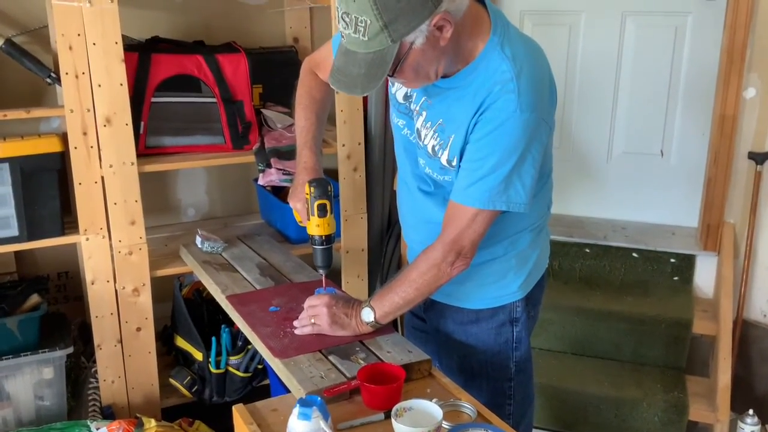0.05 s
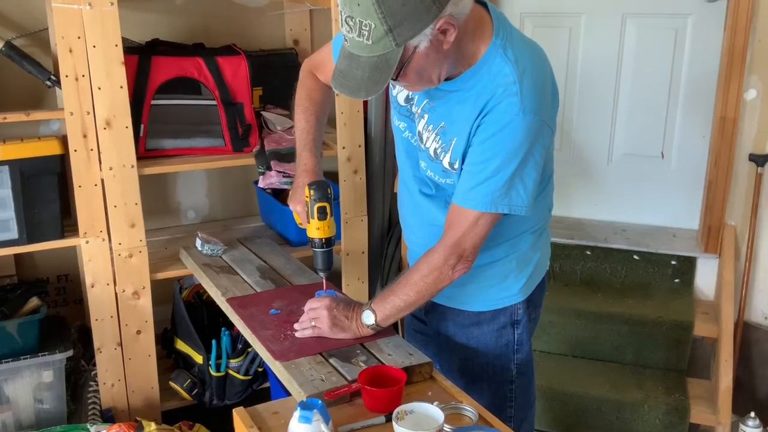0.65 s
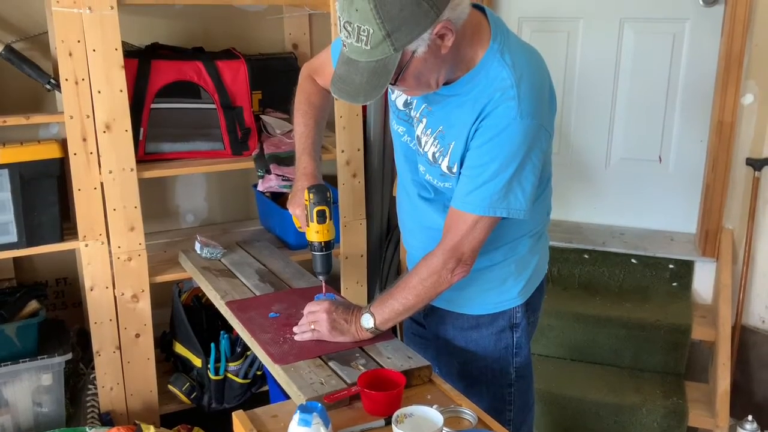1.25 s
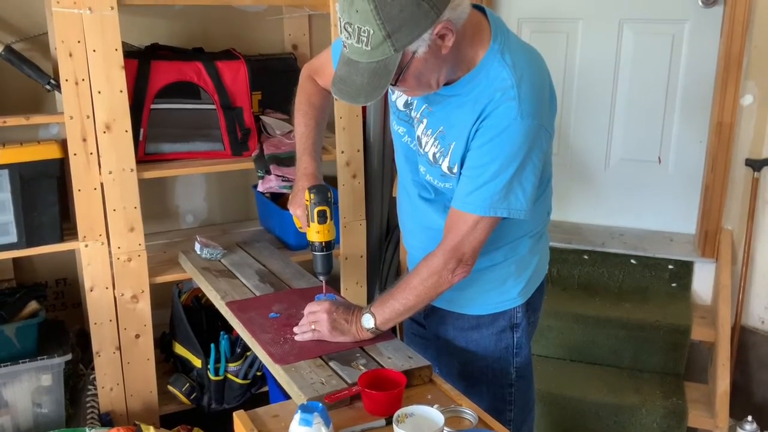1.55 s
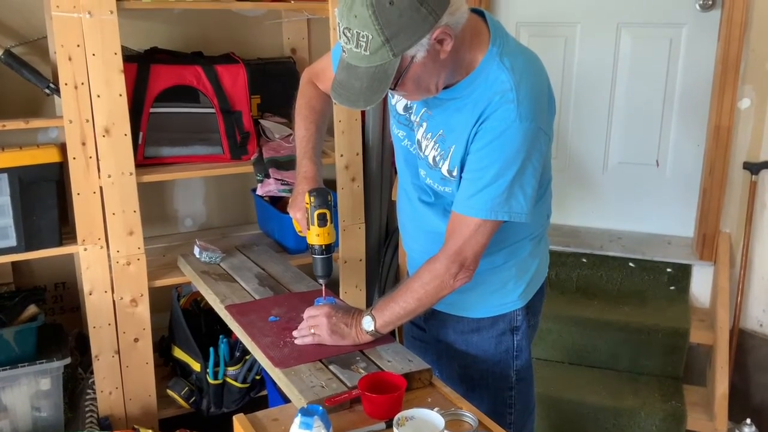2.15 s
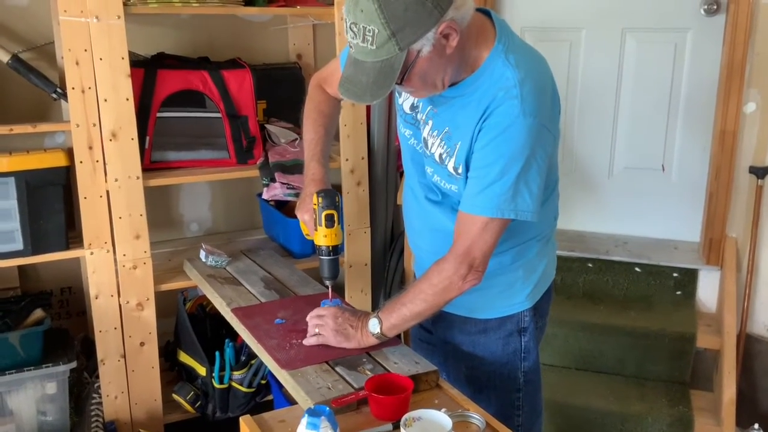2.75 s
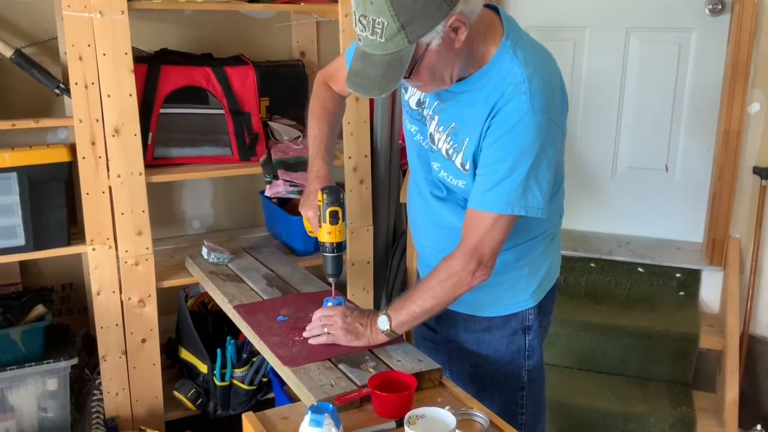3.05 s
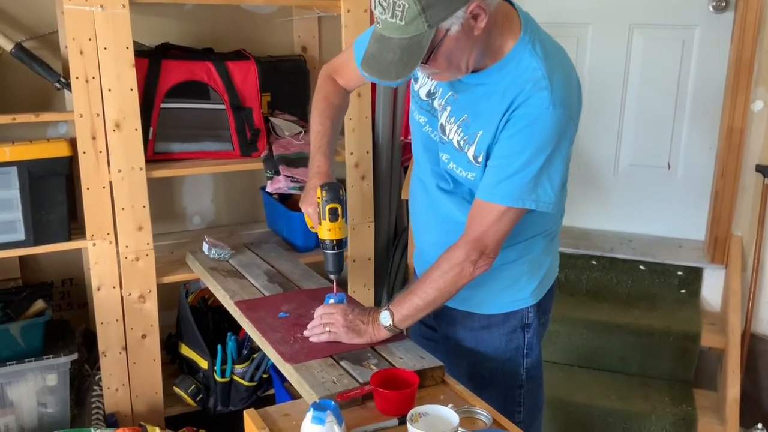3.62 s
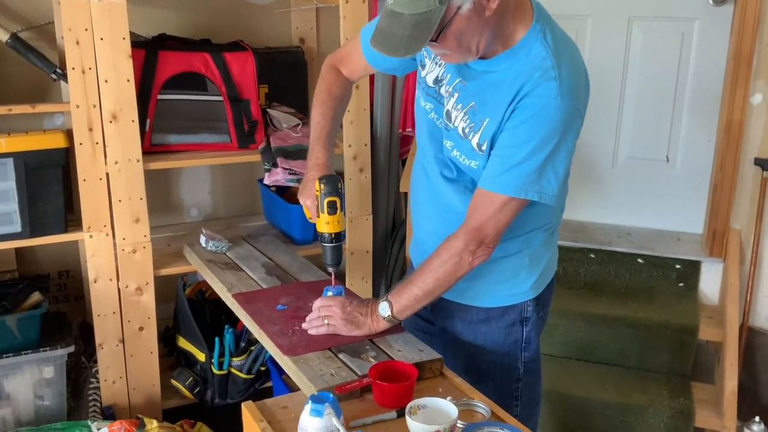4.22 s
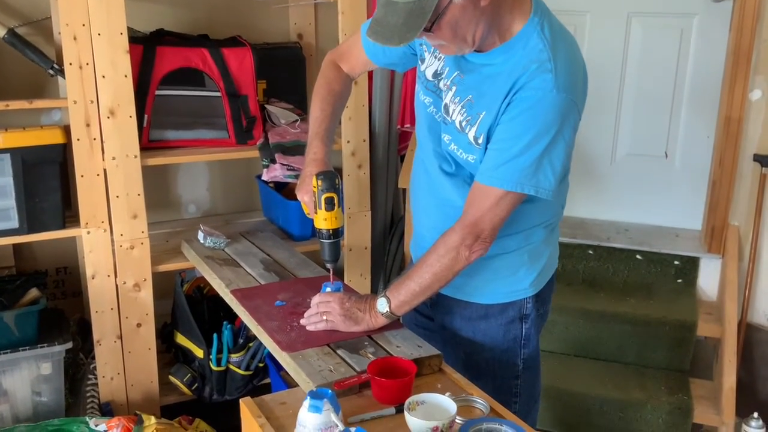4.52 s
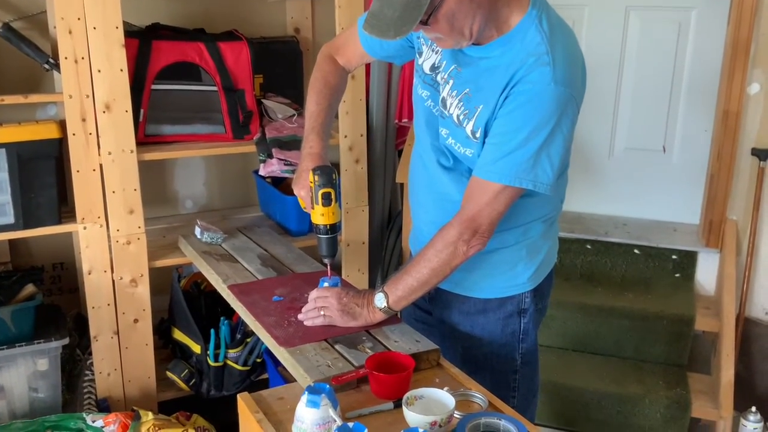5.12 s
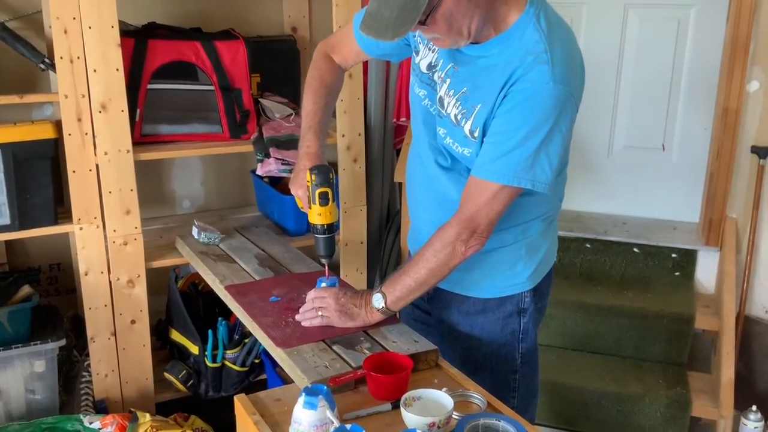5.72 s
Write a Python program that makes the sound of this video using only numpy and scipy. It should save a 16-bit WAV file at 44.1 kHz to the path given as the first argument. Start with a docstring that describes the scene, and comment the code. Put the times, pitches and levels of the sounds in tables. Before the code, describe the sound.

A cordless drill runs without a break, giving an even, high whine over a faint motor hum and gear buzz. Its bit grinds into wet china with a gritty, ringing hiss that shifts slightly as it grips and briefly skids. The wooden bench rumbles underneath and drones more near the end as the hand presses harder. A stereo microphone pair sits close to the bench in a workshop.

```python
"""A workshop, a stereo microphone pair near the bench: a cordless drill grinds through wet china.
The motor hums and whines on multiples of its shaft rate; the planetary gearbox adds two more families
of tones. Countless grit fractures make a hiss that rings in the china and the bit, shifting as the bit
grips and skids. The bench rumbles underneath, and its boards drone as the hand leans in."""
import sys
import numpy as np
from scipy import signal
from scipy.fft import rfft, irfft
from scipy.io import wavfile

SR = 44100
rng = np.random.default_rng(int(sys.argv[2]) if len(sys.argv) > 2 else 0)


def int16_out(signal):
    """Quantize to a 16-bit WAV file."""
    q = np.round(np.clip(np.atleast_2d(signal).T, -1, 1) * 32767)
    wavfile.write(sys.argv[1], SR, q.astype(np.int16))


N = 254898
TIME_S = np.arange(N) / SR
BIN_HZ = np.maximum(np.arange(N // 2 + 1), 1) * SR / N
SIDES = np.array([[.5], [-.5]])  # left and right microphone each take half of a difference


def from_db(db):
    """Decibels to gain."""
    return 10 ** (np.asarray(db) / 20)


def rms_one(x):
    """Scale to rms 1."""
    return x / np.sqrt(np.mean(x ** 2) + 1e-20)


def panned(pan_db):
    """Gains at the two microphones; positive is to the left."""
    return from_db(pan_db * SIDES)


def in_time(rows):
    """A curve of (time [s], value) at every sample."""
    return np.interp(TIME_S, *np.transpose(rows))


def in_pitch(rows):
    """Each column of a spectrum, at every bin."""
    hz, *columns = np.transpose(rows)
    return [np.interp(np.log(BIN_HZ), np.log(hz), column) for column in columns]


def bump(middle_s, half_s):
    """A smooth rise and fall of height 1."""
    return np.exp(-((TIME_S - middle_s) / half_s) ** 2)


def drift(rate_hz):
    """Random wander of rms 1, mostly slower than rate_hz."""
    hop, settle = 40, 2000
    pole = np.exp(-2 * np.pi * rate_hz * hop / SR)
    noise = rng.standard_normal(N // hop + settle + 2)
    slow = signal.lfilter([1], [1, -2 * pole, pole * pole], noise)[settle:]
    return np.interp(np.arange(N) / hop, np.arange(len(slow)), rms_one(slow))


def resonance(hz, width_hz):
    """Gain per bin of a resonance, 1 at its peak."""
    return 1 / (1 + ((BIN_HZ ** 2 - hz ** 2) / (BIN_HZ * width_hz)) ** 2)


def tone(turns, partial, rough, flutter_hz):
    """One partial at both microphones; uneven load shakes its height and phase."""
    multiple, level_db, pan_db, lead = partial
    angle = 2 * np.pi * ((multiple * turns + rng.random()) % 1) + rough * drift(flutter_hz)
    height = np.sqrt(2) * from_db(level_db) * panned(pan_db) * (1 + rough * drift(flutter_hz))
    return height * np.cos(angle + lead * SIDES)


def beating(beat_hz=.895, slowing_hz_per_s=.084, first_swell_s=.38, depth=.42):
    """Height of two close tones slipping past each other ever more slowly: broad swells, short dips."""
    t = TIME_S - first_swell_s
    beats = beat_hz * t - slowing_hz_per_s * t ** 2 / 2
    return np.abs(1 + depth * np.exp(2j * np.pi * beats)) / np.hypot(1, depth)


def motor(turns, lean, grip, skid, hum_trim_db=-.5, pan_db_per_load=3, tilt_rad=.79):
    """Unbalance hums at the shaft rate; the pinion's teeth whine high above it, with looser sidebands."""
    # hum, whine and whistle: (multiple of shaft rate, base level [dB], left-right [dB], left lead [rad])
    main_tones = [(1, -51.0, -1.2, -0.0), (11, -33.2, 0.0, 2.4), (33, -44.9, -0.4, -0.5)]
    # weaker tones and sidebands: (multiple of shaft rate, level [dB], left-right [dB], left lead [rad])
    sidebands = [(2, -63.0, -2.9, 1.2), (10, -55.6, -0.8, 2.8), (10.4, -51.7, -0.0, 2.7),
                 (10.6, -49.9, -1.6, 2.7), (10.8, -49.5, -0.7, 2.4), (12, -46.0, -0.1, 1.5),
                 (13, -55.9, -0.7, 0.4), (21, -53.6, -1.5, 0.3), (22, -52.0, -1.9, 0.5),
                 (31, -56.3, -0.6, -0.1), (32, -52.1, -1.0, -0.3), (34, -51.7, -0.6, -0.4)]
    # swells and dips of the whine: (time [s], gain [dB])
    whine_swells = [(0, 1.2), (1.6, 1.5), (2.1, 0), (3.25, -0.5), (3.55, -4), (3.9, -3), (4.07, 2.5),
                    (4.3, -3), (4.7, -2), (4.95, 2.5), (5.5, 2.5), (5.78, -1.5)]
    hum, (*whine, lead), whistle = main_tones
    # leaning in tilts the drill: the whine moves left and its phase turns between the microphones
    tilted_whine = (*whine, lead + tilt_rad * bump(middle_s=4.48, half_s=.21))
    whine_gain = from_db(in_time(whine_swells)) * panned(pan_db_per_load * lean)
    whistle_db = -2 + 6 * grip - 5 * skid
    out = from_db(hum_trim_db) * beating() * tone(turns, hum, rough=.21, flutter_hz=13)
    out += whine_gain * tone(turns, tilted_whine, rough=.12, flutter_hz=22)
    out += from_db(whistle_db) * tone(turns, whistle, rough=.18, flutter_hz=32)
    return out + sum(tone(turns, row, rough=.59, flutter_hz=7.9) for row in sidebands)


def gearbox(turns, lean, mesh_per_turn=2.748, planet_per_turn=.8751, pan_db_per_load=-7):
    """Meeting teeth give a clear tone with overtones, over the planet gears' buzz and a faint low hum."""
    # teeth meeting: (multiple of mesh rate, base level [dB], left-right [dB], left lead [rad])
    mesh_tones = [(1, -47, 6.5, 1.31), (2, -47.5, 5, -1.7), (3, -44.5, -1, -2.5), (5, -53, -5, -0.5)]
    # planets circling: (multiple of planet rate, base level [dB], left-right [dB], left lead [rad])
    planet_tones = [(1, -57.8, 0.7, -0.2), (2, -61.6, -5.0, 1.3), (17, -54.7, -0.7, 0.4),
                    (20, -59.8, -3.0, 0.3), (21, -52.5, -2.3, 0.5), (22, -57.2, -2.4, 0.2),
                    (25, -51.3, -0.4, 0.3), (26, -55.4, -1.5, 0.7), (27, -52.8, -1.0, 0.9),
                    (28, -58.8, -0.5, 1.2)]
    # gear train hum: (multiple of shaft rate, base level [dB], left-right [dB], left lead [rad])
    hum_tones = [(1.706, -60.5, 0, .8), (1.874, -60.5, 0, .8)]
    # swells and dips of the mesh tone's octave: (time [s], gain [dB])
    octave_swells = [(0, -0.5), (1.4, -2), (2.25, -7), (2.95, 3), (3.8, .3), (4.7, 0), (5.0, 4.3),
                     (5.78, 4)]
    mesh = [tone(turns * mesh_per_turn, row, rough=.16, flutter_hz=18) for row in mesh_tones]
    mesh[1] *= from_db(in_time(octave_swells)) * panned(pan_db_per_load * lean)  # leaning moves it right
    planets = sum(tone(turns * planet_per_turn, row, rough=.31, flutter_hz=5.9) for row in planet_tones)
    hum = sum(tone(turns, row, rough=.35, flutter_hz=5.5) for row in hum_tones)
    return sum(mesh) + from_db(.5) * planets + from_db(-1.4) * hum


def grit(turns, throb, per_s=28000, spread_db=2.0, clump_db=.5, clump_hz=45):
    """Tiny fractures of random size, in clumps; throb makes them stronger once each shaft turn."""
    fractures = rng.random(N) < per_s / SR
    sizes = from_db(spread_db * np.minimum(rng.exponential(1, N), 5)) * rng.choice([-1, 1], N)
    pressure = (1 + throb * np.cos(2 * np.pi * turns)) * from_db(clump_db * drift(clump_hz))
    return rms_one(fractures * sizes * pressure)


def standing_waves(ripple_db, spacing_hz):
    """Reflections from bench and shelves comb the spectrum into chance peaks and dips."""
    ripple = rng.standard_normal(len(BIN_HZ))
    return from_db(ripple_db * np.interp(BIN_HZ / spacing_hz, np.arange(len(ripple)), ripple))


def radiate(force, response):
    """A force sounds through a body and reaches the pair partly direct, partly as a wash of room sound."""
    # field at the microphones: (frequency [Hz], direct share [0-1], left lead [rad], left-right [dB])
    sound_field = [(80, 1.0, 0.0, 0.0), (250, 0.98, -0.1, -0.5), (500, 0.75, 1.1, -0.5),
                   (720, 0.4, 2.4, 3.0), (1000, 0.18, 1.8, -2.2), (1350, 0.43, 0.3, -0.4),
                   (1900, 0.47, -0.5, -0.9), (2500, 0.77, -2.7, -1.0), (3100, 0.94, -3.9, -0.0),
                   (3450, 0.88, -4.7, -0.6), (3900, 0.84, -5.8, -0.8), (4800, 0.83, -6.1, -0.2),
                   (6300, 0.89, -6.0, -1.8), (7300, 0.7, -5.3, -0.8), (8500, 0.98, -6.3, -0.1),
                   (9800, 0.93, -6.7, -0.4), (12000, 0.94, -6.4, 0.0), (14500, 0.74, -7.0, 0.0)]
    share, lead, pan_db = in_pitch(sound_field)
    direct = np.sqrt(share) * np.exp(1j * lead * SIDES) * rfft(force)
    wash = np.sqrt(1 - share) * rfft(rng.standard_normal((2, N)))
    return irfft((direct + wash) * panned(pan_db) * response, N) * np.sqrt(SR / 2)


def grinding(turns, cut, wander_db=.52, hiss_follows=.49):
    """Grit excites each resonance as the state of the cut drives it; the hiss partly follows their mean."""
    # resonances of bench, china, bit and housing:
    # (frequency [Hz], width [Hz], base density [dB per Hz], throb with the shaft [0-1])
    rings = [(468, 145, -75.5, 0.17), (1403, 880, -72, 0), (3185, 610, -64.5, 0), (4280, 1100, -71, 0.18),
             (6200, 650, -67.7, 0.13), (9230, 600, -73.5, .12), (9870, 680, -67.5, 0.06)]
    # how each of them answers the cut: (per load [dB], per grip [dB], skid [dB], through the glaze [dB])
    answers = [(.9, -1, .3, 1.5), (-.2, -.7, 1.5, 1.0), (0.5, -.3, 0.7, 0.5), (0.5, -0.5, 0, 0),
               (3, -0.3, -2, -.7), (.3, 2.6, -2.2, .2), (-.5, 1.2, -1, 0)]
    # broad hiss of the cut: (frequency [Hz], base density [dB per Hz])
    hiss_spectrum = [(150, -98.5), (350, -78), (700, -77.5), (950, -79.5), (2300, -72.8), (2750, -74),
                     (3600, -73.4), (5300, -75.2), (6800, -73), (7900, -76), (9100, -73), (11100, -77),
                     (12900, -79), (13900, -76), (15700, -80.5)]
    # narrow modes of the dish that stand out of the hiss: (frequency [Hz], width [Hz], lift [dB])
    dish_modes = [(1274, 130, 4.5), (1800, 60, 5.5), (4000, 90, 1.5), (4130, 57, 6), (4640, 110, 4.5),
                  (6330, 200, 2), (10660, 190, 3.5), (11600, 200, 3)]
    drives_db = [np.dot(answer, cut) + wander_db * drift(rate_hz=4) for answer in answers]
    drives_db = [drive_db - drive_db.mean() for drive_db in drives_db]
    hiss_db, = in_pitch(hiss_spectrum)
    hiss_db += sum(lift_db * resonance(hz, width_hz) for hz, width_hz, lift_db in dish_modes)
    comb = standing_waves(ripple_db=2.0, spacing_hz=20)
    hiss = radiate(grit(turns, throb=.099), comb * from_db(hiss_db))
    out = hiss * from_db(hiss_follows * np.mean(drives_db, axis=0))
    for (hz, width_hz, level_db, throb), drive_db in zip(rings, drives_db):
        ring = radiate(grit(turns, throb), comb * resonance(hz, width_hz))
        out += ring * from_db(level_db + drive_db)
    return out


def bench(lean, rumble_db_per_load=-1.5, wander_db=1.2, drone_db=-78.5, drone_db_per_load=9):
    """The dragging bit shakes the bench unevenly; pressure damps the rumble and sets the boards droning."""
    # rumble under the bit: (frequency [Hz], base density [dB per Hz])
    rumble_spectrum = [(20, -115), (40, -106), (50, -93), (65, -76.5), (100, -81), (200, -83), (330, -92)]
    rumble_db, = in_pitch(rumble_spectrum)
    rumble = radiate(rng.standard_normal(N), from_db(rumble_db))
    rumble *= from_db(rumble_db_per_load * lean + wander_db * drift(rate_hz=2.2))
    drone = radiate(rng.standard_normal(N), resonance(hz=133, width_hz=45))
    return rumble + drone * from_db(drone_db + drone_db_per_load * lean)


def gripping(attack_s=.11, release_s=.12):
    """How hard the bit grips the china: each grip builds up, holds and lets go."""
    # grips that make the bit sing: (start [s], length [s], strength [0-1])
    grips = [(.85, .3, .25), (1.62, 0.89, 0.86), (3.02, .4, 1), (3.53, .42, .9), (4.05, .25, .35)]
    grip = np.zeros(N)
    for start_s, length_s, strength in grips:
        rise = np.clip((TIME_S - start_s) / attack_s, 0, 1)
        fall = np.clip(1 - (TIME_S - start_s - length_s) / release_s, 0, 1)
        grip += strength * rise * fall
    return grip


def scene(shaft_hz=291.48, sag_hz_per_load=1.0, glaze_gives_s=1.9, wear_takes_s=.4):
    """One turning shaft, slowed a little by the hand's pressure, drives the motor, gears and cut."""
    # the hand leans in, a little at first, then hard: (time [s], load [1 = firm pressure])
    hand_pressure = [(0, 0), (1.55, 0), (1.85, .3), (4.1, 0.33), (4.3, 1.15), (5.78, 0.73)]
    # the drill shifts slightly right of the pair's centre, then left: (time [s], left-right [dB])
    drill_position = [(0, 0), (2.8, -.3), (4.4, -.1), (5.4, .35)]
    load = in_time(hand_pressure)
    lean = load - load.mean()
    grip = gripping()
    skid = bump(middle_s=2.85, half_s=.3)  # the bit skids once, with a lower rasp
    through_glaze = np.clip((TIME_S - glaze_gives_s) / wear_takes_s, 0, 1)  # into the rougher china
    cut = np.array([load, grip, skid, through_glaze])
    speed_hz = (shaft_hz - sag_hz_per_load * load) * (1 + .00016 * drift(rate_hz=5))
    turns = np.cumsum(speed_hz) / SR
    drill = motor(turns, lean, grip, skid) + gearbox(turns, lean) + grinding(turns, cut)
    return drill * panned(in_time(drill_position)) + bench(lean)


def record(dry, cutoff_hz=15750):
    """Both microphone channels pass a steep low-pass filter."""
    return signal.sosfilt(signal.ellip(12, .1, 80, cutoff_hz, fs=SR, output="sos"), dry)


dry = scene()
out = record(dry)
int16_out(out)
```